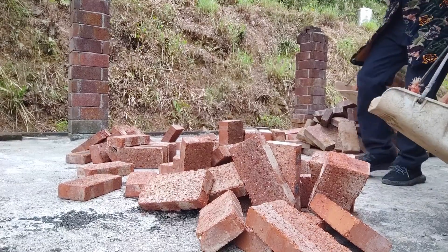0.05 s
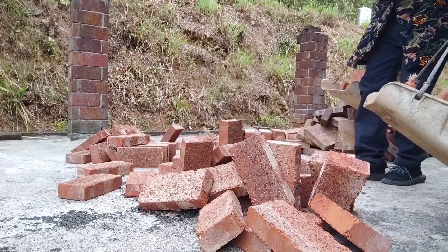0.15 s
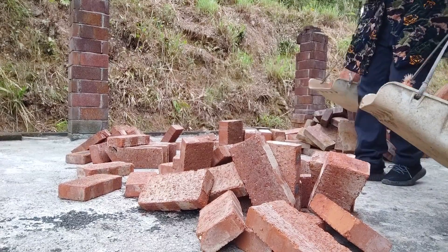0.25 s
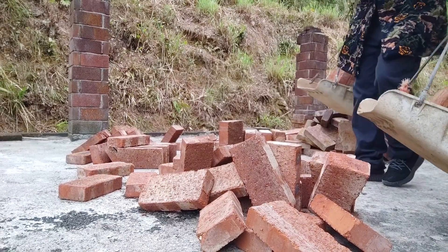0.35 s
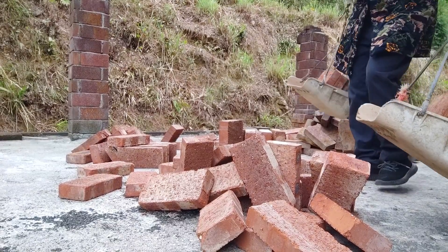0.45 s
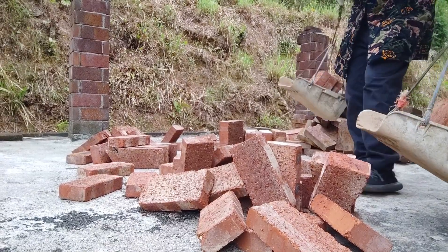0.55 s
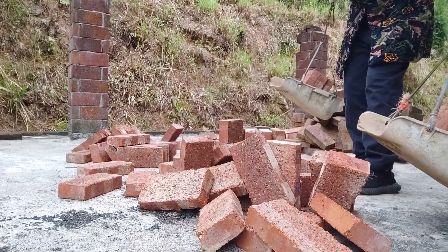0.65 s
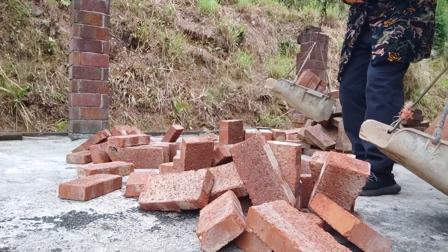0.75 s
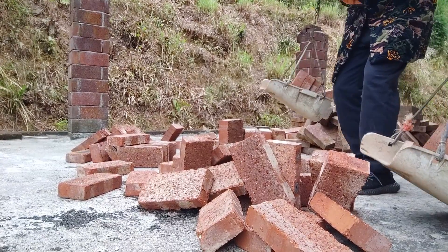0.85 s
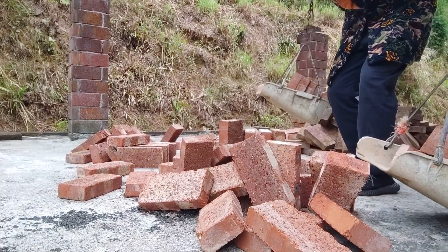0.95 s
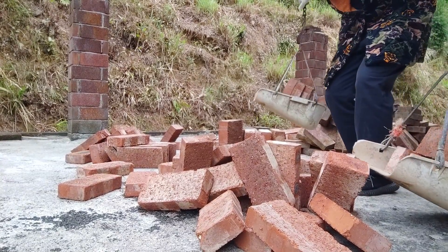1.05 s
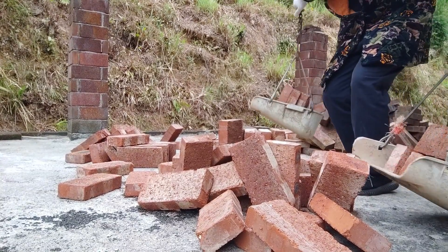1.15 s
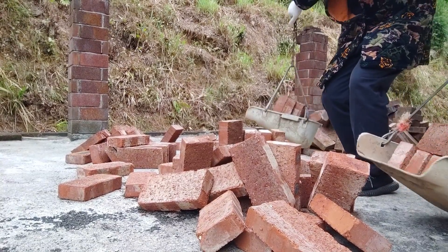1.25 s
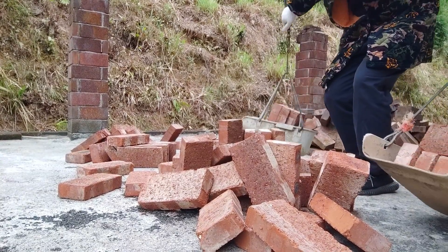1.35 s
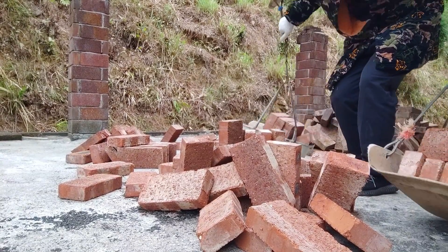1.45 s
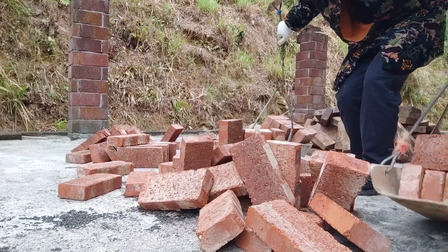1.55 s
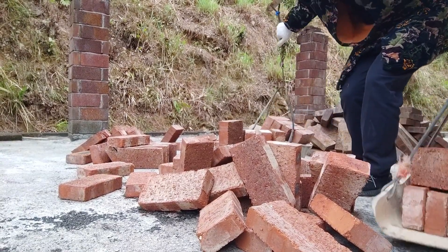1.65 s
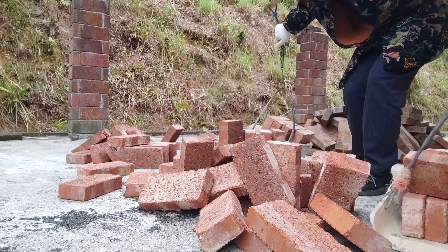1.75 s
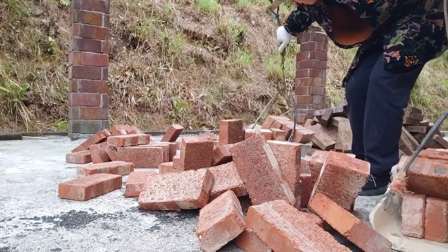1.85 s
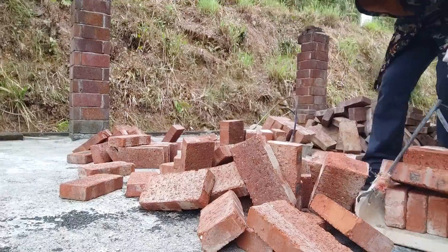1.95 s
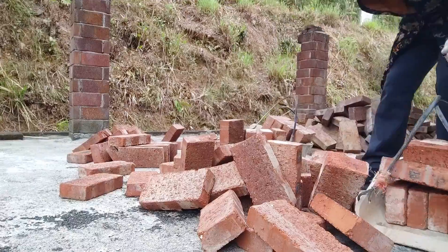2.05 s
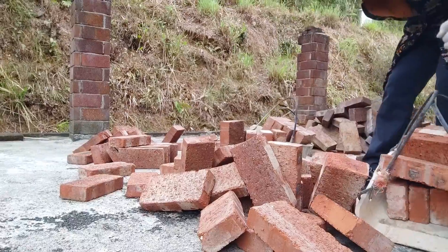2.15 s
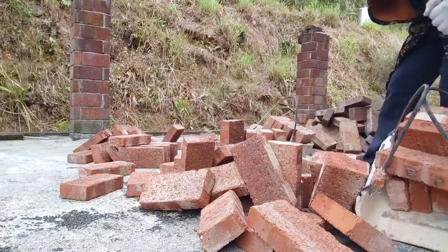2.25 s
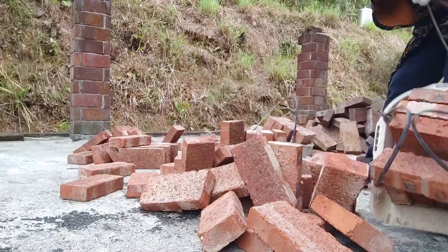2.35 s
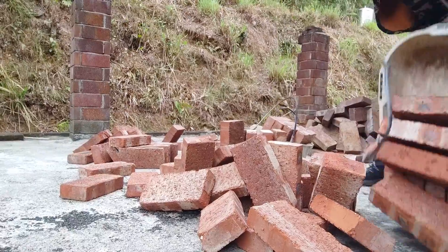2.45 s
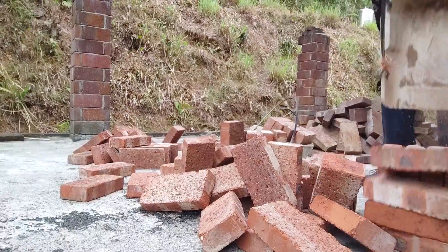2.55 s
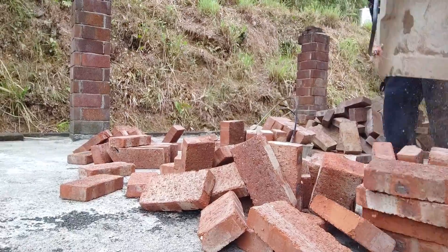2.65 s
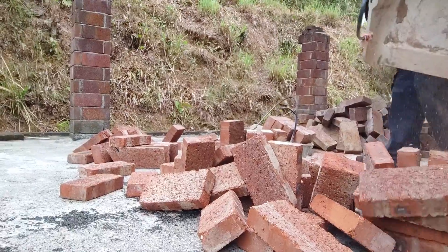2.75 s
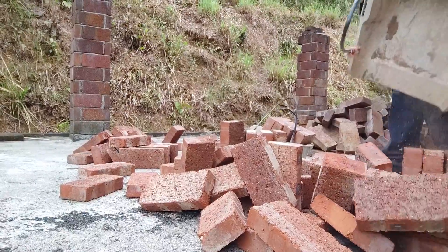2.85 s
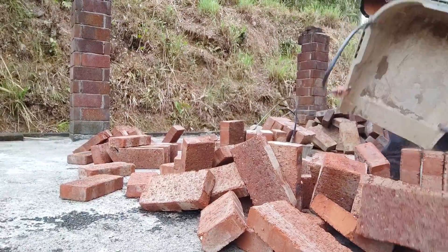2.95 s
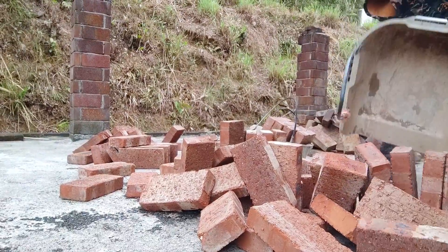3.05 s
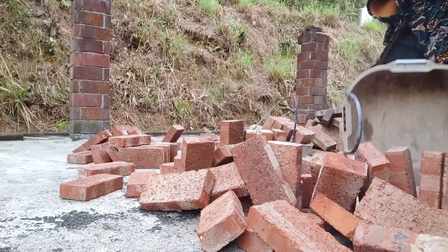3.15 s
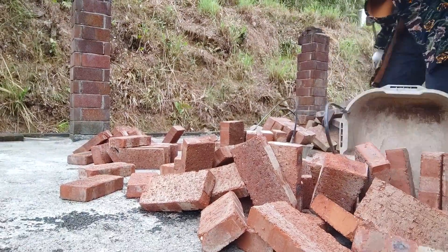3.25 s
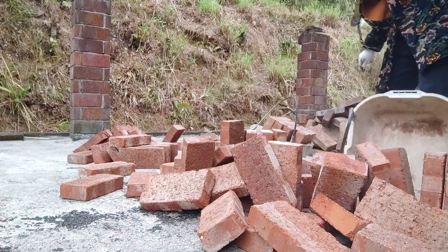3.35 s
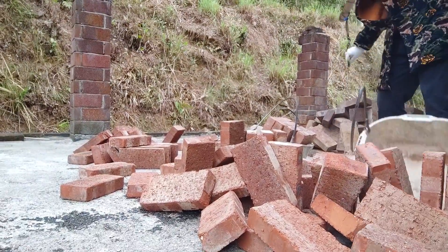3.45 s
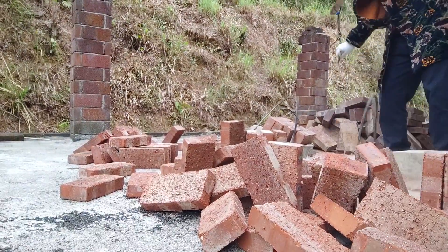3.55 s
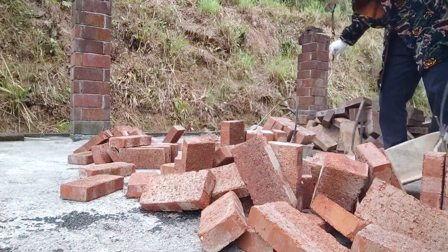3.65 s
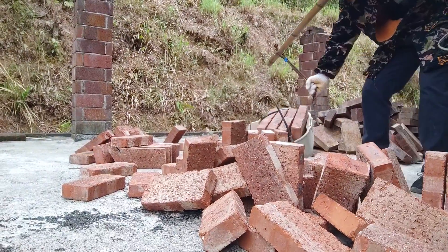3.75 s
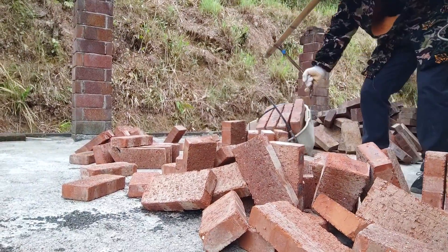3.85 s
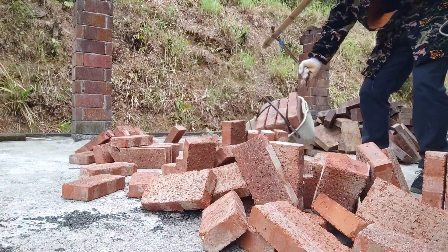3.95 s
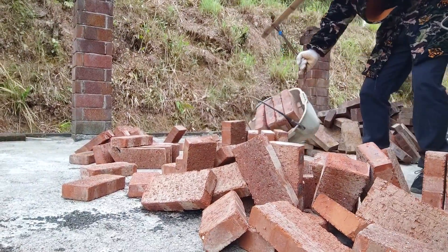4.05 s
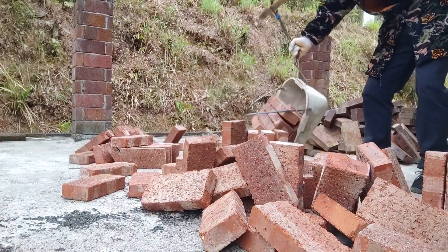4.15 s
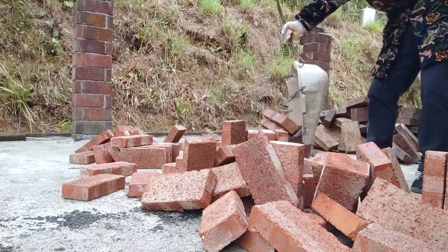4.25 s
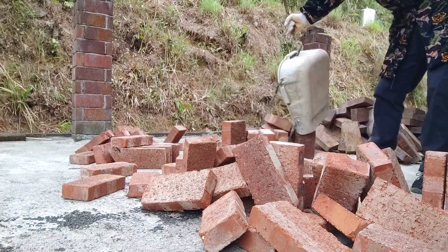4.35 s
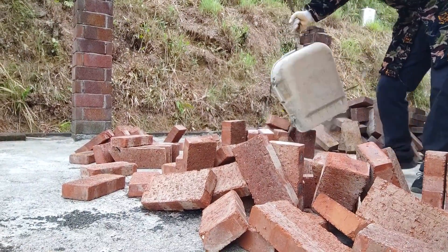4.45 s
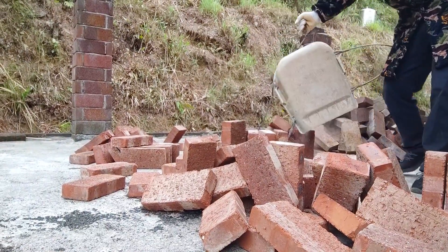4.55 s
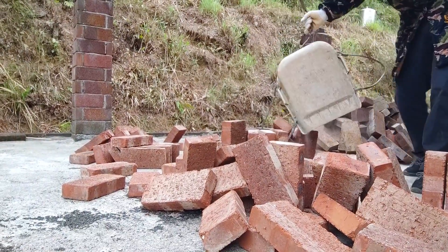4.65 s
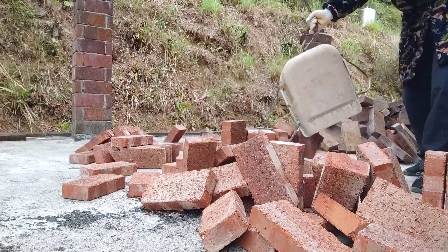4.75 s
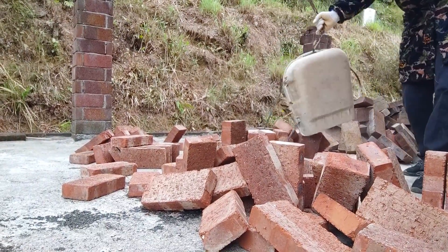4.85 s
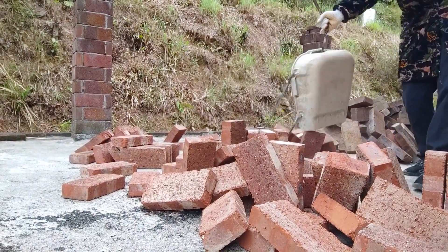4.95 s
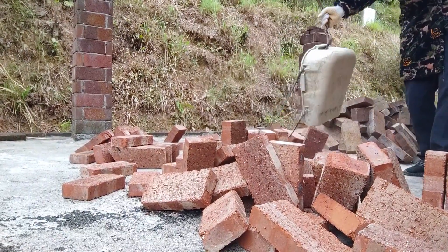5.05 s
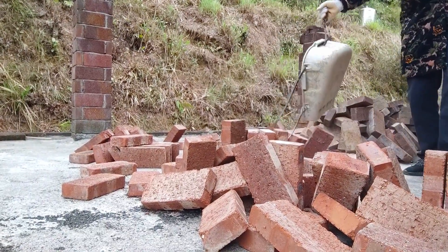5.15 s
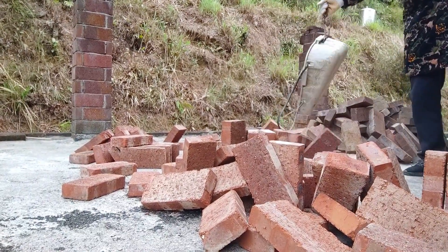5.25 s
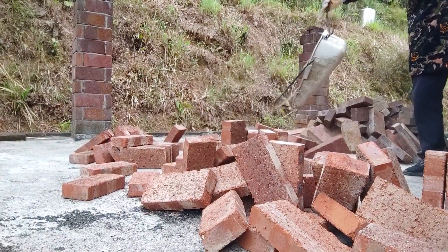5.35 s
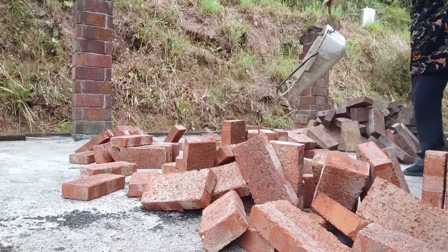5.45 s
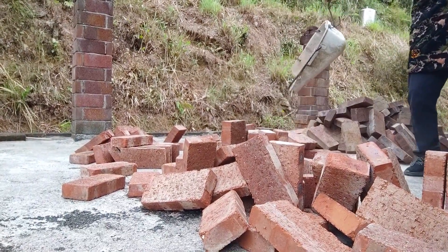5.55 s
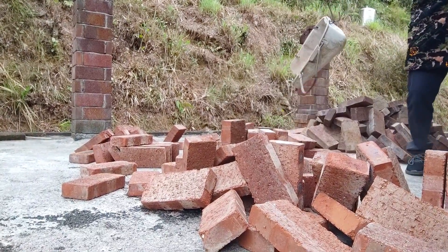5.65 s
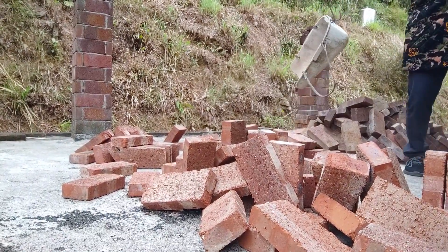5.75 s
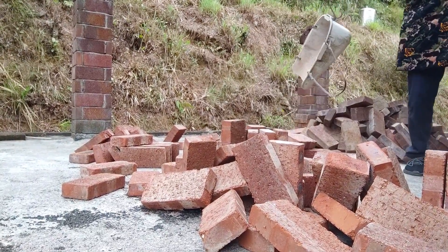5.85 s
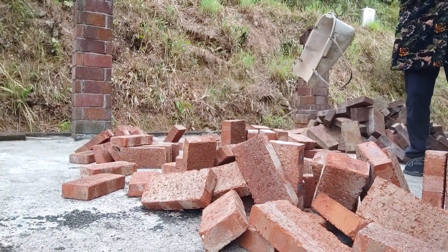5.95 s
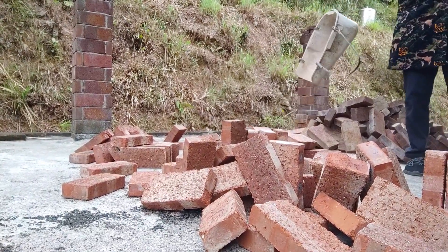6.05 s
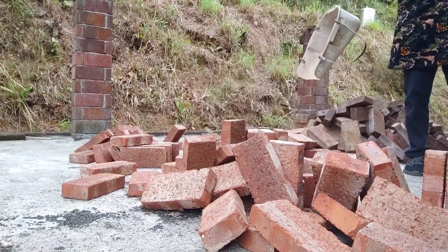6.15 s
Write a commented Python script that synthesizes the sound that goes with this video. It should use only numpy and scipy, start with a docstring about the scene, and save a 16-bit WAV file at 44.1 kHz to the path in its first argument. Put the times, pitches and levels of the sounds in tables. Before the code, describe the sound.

Two baskets of bricks are tipped in a concrete yard: sharp clacks, a gritty rush, then hollow knocks and faint metallic rattles in wind.

```python
"""Clay bricks tipped from plastic baskets

A worker tips two pole-carried baskets of bricks onto a pile in a concrete yard. Bricks clack as damped modes,
tumble as short tones and slide as grainy noise over a drone; the hollow baskets thump, slap and boom.
Steel hangers ring and rattle, a few squeaks glide, and scattered echo trails the work, which lies to the right.
Wind is coloured noise with short puffs at a close microphone, over a faint steady hiss.
"""
import sys
import numpy as np
from scipy import signal
from scipy.fft import rfft, irfft, next_fast_len
from scipy.io import wavfile
from scipy.ndimage import uniform_filter1d

SR = 44100
rng = np.random.default_rng(int(sys.argv[2]) if len(sys.argv) > 2 else 0)


def to_wav(s):
    """Save 16-bit WAV."""
    ch = np.atleast_2d(s).T  # columns
    pcm = np.round(np.clip(ch, -1, 1) * 32767)  # PCM
    wavfile.write(sys.argv[1], SR, pcm.astype(np.int16))


N = 272979
TIME = np.arange(N) / SR
AGE = TIME[:SR // 2]   # time since a blow [s]

# Event levels and mode levels are relative: each layer adds its own gain.
# Wind strength: (time [s], rumble level [dB], buffeting level [dB])
WIND = [(0.0, -29.5, -43.5), (0.86, -23.5, -29.5), (1.17, -30, -37.5), (1.5, -32.5, -39),
        (1.57, -24.5, -36), (2.62, -28.5, -30.5), (2.76, -46, -35), (2.83, -21.5, -30.5),
        (3.24, -33.5, -26.5), (3.55, -24.5, -32.5), (3.71, -45, -47), (3.93, -37, -42), (4.21, -39, -30),
        (4.36, -35, -33), (4.5, -31.5, -30), (5.59, -26.5, -29), (5.9, -31.5, -41.5), (6.19, -30.5, -44)]
# Side the wind comes from, before its wander: (time [s], left minus right [dB])
WIND_SIDE = [(0.0, -7), (2.74, 2), (2.84, -10), (3.19, 6.5), (3.76, -6), (3.79, -11), (3.89, 11),
             (4.26, 1.5), (5.62, -5.0), (6.02, 3.5), (6.16, -3), (6.19, -22)]
WIND_WANDER_DB, WIND_WANDERS_PER_S = -1.5, 5.6
# Strongest puffs of wind: (time [s], level [dB])
PUFFS = [(0.033, -17.5), (0.057, -17), (0.219, -25.5), (0.414, -20.5), (0.541, -20.5), (0.618, -17.5),
         (0.743, -15.5), (0.774, -15), (1.044, -12), (1.886, -13), (1.953, -14.5), (2.396, -10),
         (2.825, -12), (2.86, -10), (5.45, -14), (5.73, -22)]
# Spectra of the wind layers and of the hiss: (frequency [Hz], level [dB])
RUMBLE_COLOUR = [(15, -1), (30, -3.5), (60, -1), (100, -5), (160, -10.5), (300, -49), (600, -90.5)]
BUFFET_COLOUR = [(60, -7.5), (130, 3.5), (220, 1), (350, -7.5), (500, -19), (750, -28.5), (1300, -52.5)]
PUFF_COLOUR = [(80, 4), (200, 8), (380, -1.5), (620, -14), (900, -32), (1600, -56.5)]
HISS_COLOUR = [(200, 10), (600, -2.5), (1200, -2.5), (2200, 1), (4000, -3.5), (7500, -4.5), (9000, -18.5),
               (11000, -10), (15000, -16)]
HISS_DB, HISS_DB_PER_S = -49, -0.87   # level at the start, and its slow fade
# Left-right likeness of wind and hiss, then of the work: (frequency [Hz], correlation [-1 to 1])
WIND_LIKENESS = [(30, 0.029), (70, 0.19), (140, 0.3), (300, 0.58), (1000, 0.016)]
WORK_LIKENESS = [(100, 0.8), (400, 0.55), (1000, 1), (2500, 0.17), (5000, 0.21), (15000, 0.11)]
# Decay of the yard's echo: (frequency [Hz], t60 [s])
YARD_DECAY = [(100, 0.049), (500, 0.4), (2500, 0.25), (8000, 0.27), (16000, 0.085)]
# Direction of the work: (time [s], delay at the left port [ms])
BEARING = [(0, 0.22), (3.7, 0.21), (4.2, 0.07), (6.2, 0.07)]

# Hooks and ropes squeaking under load:
# (start [s], length [s], level [dB], starting pitch [Hz], glide [octaves/s], stick-slip amount [0-1])
SQUEAKS = [(1.827, 0.061, -35.5, 2855, 0.5, 0.1), (1.936, 0.035, -50, 2910, 1.5, 0),
           (3.786, 0.03, -38.5, 2875, -2.5, 0.9), (3.838, 0.023, -46, 2900, 3.5, 0.24),
           (3.978, 0.057, -49, 967, -0.7, 0.2), (5.337, 0.025, -48.5, 2860, 1, 0.43)]
SLIPS_PER_S, SQUEAK_ATTACK_S, SQUEAK_RELEASE_S, SQUEAK_WAVER = 350, 0.022, 0.015, 0.0042
# Loose hangers rattling while a basket is shaken or swung:
# (start [s], length [s], level [dB], pitch that rings most [Hz])
RATTLES = [(2.698, 0.24, -36.5, 2020), (2.97, 0.094, -39.5, 2700), (3.058, 0.11, -34, 2350),
           (3.25, 0.4, -41.5, 2180), (4.401, 0.14, -43.5, 2530), (4.505, 0.15, -45.5, 2470),
           (4.697, 0.11, -41, 2670), (4.853, 0.11, -44, 2680), (5.01, 0.24, -38.5, 2440)]
RATTLE_ATTACK_S, RATTLE_RELEASE_S = 0.026, 0.048
# Jolts of the steel hangers: (time [s], level [dB], pitch that rings most [Hz])
JOLTS = [(2.581, -18, 2330), (2.881, -16.5, 2260), (3.016, -24, 3000), (3.5668, -25.5, 2220),
         (4.4016, -30, 2653), (4.703, -39, 2200), (5.013, -38, 2930), (5.1905, -29.5, 2280),
         (5.236, -23.5, 2200), (5.406, -24.5, 2460), (5.558, -38.5, 2830)]
# Modes of the steel hangers; jolts choke them and rattles only use the first two columns:
# (frequency [Hz], level [dB], t60 [s])
HANGER_MODES = [(1870, 6, 0.3), (1965, 4.5, 0.35), (2130, -0.5, 0.25), (2210, 8, 0.11), (2356, 7, 0.31),
                (2590, 2, 0.18), (2820, 2.5, 0.13), (2844, 2, 0.45), (2994, 10, 0.17), (3330, -13.5, 0.15),
                (4050, -5, 0.15)]

# The second basket, still full, lands on the pile with a short boom that stops abruptly
LANDING_S, BOOM_END_S, BOOM_FLANK_S = 3.6485, 3.702, 0.008
LANDING_DB = -14.5
# Modes of the full basket's floor: (frequency [Hz], level [dB], t60 [s])
FLOOR_MODES = [(332, 1, 0.12), (433.3, 1, 0.18), (721, 8, 0.089), (992, 4, 0.12), (987, -15, 0.073)]
# Blows on the baskets; a loaded wall flexes higher than an empty one:
# (time [s], thump level [dB], slap level [dB], flexing wall pitch [Hz], favoured rim pitch [Hz])
KNOCKS = [(0.715, -11.5, -37.5, 205, 714), (0.986, -9.5, -30.5, 171, 1020), (1.566, -5.5, -19, 173, 690),
          (1.621, -5.5, -39, 174, 600), (1.635, -10.5, -35, 268, 600), (1.786, -8.5, -14.5, 237, 980),
          (2.162, -6.5, -21, 312, 766), (2.25, -14, -28, 325, 750), (2.428, -7.5, -20, 302, 700),
          (2.456, -7.5, -16.5, 400, 696), (2.477, -3.5, -23, 400, 680), (2.522, -9.5, -18.5, 316, 718.6),
          (2.578, -5.5, -17, 310, 955), (2.616, -1.5, -15, 322, 700), (2.645, -0.5, -12.5, 354, 750),
          (2.661, -2, -14, 172, 890), (2.883, -8, -32, 173, 1000), (3.054, -8.5, -28.5, 264, 850),
          (3.077, -11, -29, 372, 700), (3.115, -7, -16.5, 335, 720), (3.151, -5, -14.5, 293, 734),
          (3.303, -1, -25, 240, 810), (3.317, -5.5, -26, 248, 700), (3.361, -3.5, -23.5, 247, 620),
          (3.649, -9, -17, 308, 940), (3.656, -4.5, -25.5, 312, 980), (3.68, -12, -35, 418, 750),
          (4.263, -7.5, -19, 385, 700), (4.289, -6.5, -36, 268, 796), (4.333, -2, -15, 190, 970),
          (4.367, 0.5, -15, 164, 770), (4.382, 1, -20, 204, 680), (4.545, -1, -14, 210, 895),
          (4.966, 0.5, -16, 205, 850), (5.015, -8, -16.5, 200, 930), (5.054, -5.5, -18.5, 186, 810),
          (5.141, -5, -27.5, 174.4, 850), (5.2275, -2.5, -16, 197, 990), (5.406, -24, -24.5, 142, 780),
          (5.557, -1.5, -14, 247, 970)]
# Modes of the basket wall, before each blow detunes them: (frequency [Hz], level [dB], t60 [s])
WALL_MODES = [(156, -16.5, 0.038), (208, -14, 0.098), (275.3, -14.5, 0.1), (319, -11.5, 0.1),
              (413.7, -13, 0.11), (482.7, -21.5, 0.23), (554.2, -25.5, 0.22)]
# Modes of the stiff rim and ribs, before detuning: (frequency [Hz], level [dB], t60 [s])
RIM_MODES = [(597.7, 1, 0.054), (700, 2, 0.06), (862, -1, 0.046), (982, -0.5, 0.044), (1125, -5, 0.036),
             (1363, -2.5, 0.03)]
# A thump that outweighs its slap by more than the usual gap is soft, and its flex lasts longer
USUAL_GAP_DB, SOFTNESS_SHARE = 18, 0.26   # softness gains this share [dB/dB] of the excess

# Bricks sliding, with a few scuffs of feet, rustles and rope:
# (start [s], length [s], drone level [dB], scrape level [dB], grit level [dB], starting drone pitch [Hz])
SLIDES = [(0.223, 0.0099, -50, -50, -52, 300), (0.682, 0.043, -40, -51, -54, 300),
          (0.965, 0.012, -29.5, -28, -39.5, 285), (1.39, 0.053, -53, -49.5, -51, 450),
          (1.51, 0.187, -34, -39.5, -52, 480), (1.579, 0.048, -36, -34, -43, 327),
          (1.742, 0.0088, -35, -29.5, -45, 332.6), (1.821, 0.14, -38.5, -40.5, -53.5, 440),
          (2.04, 0.13, -61, -58, -54.5, 393.2), (2.34, 0.058, -37, -41, -45.5, 350),
          (2.428, 0.033, -16, -24, -31, 474.7), (2.49, 0.035, -17.5, -48, -65, 406.4),
          (2.72, 0.081, -31, -60, -71, 397), (2.862, 0.11, -54, -36.5, -42.5, 329),
          (3.39, 0.2, -39.5, -55, -60.5, 418), (3.93, 0.16, -38, -47.5, -83, 522.4),
          (4.135, 0.045, -24.5, -27.5, -44, 440), (4.212, 0.081, -21, -27.5, -41, 399.7),
          (4.33, 0.047, -23.5, -27, -41, 294), (5.073, 0.04, -45, -44, -46.5, 342),
          (5.355, 0.066, -63, -46.5, -52, 350)]
SLIDE_ATTACK_S, SLIDE_RELEASE_S = 0.032, 0.037   # time for 20 dB
GRIT_DB_PER_S = -16   # the grit wears off on the way
# Bricks jostling as they pour out: (start [s], length [s], level [dB], middle pitch [Hz])
TUMBLES = [(2.42, 0.061, -22, 2330), (2.486, 0.072, -28.5, 1860), (2.643, 0.068, -20, 2320),
           (4.101, 0.09, -35, 1900), (4.204, 0.14, -29.5, 1615)]
# Brick striking brick: (time [s], clack level [dB], crack level [dB], centre of the ring [Hz])
CLACKS = [(1.4224, -37, -36.5, 4000), (1.578, -12, -34, 1800), (1.637, -30.5, -37, 3200),
          (1.747, -19, -44, 2160), (1.789, -11.5, -14.5, 2830), (2.162, -13, -32.5, 1700),
          (2.235, -39, -40, 3000), (2.25, -25, -37.5, 1560), (2.356, -36, -27.5, 2775),
          (2.389, -34, -32, 2830), (2.413, -19, -36, 3040), (2.4214, -9, -20.5, 3840),
          (2.4307, -28, -23, 2500), (2.4387, -15.5, -21, 3100), (2.448, -19, -47, 1900),
          (2.473, -20, -30, 3100), (2.507, -18, -30, 3620), (2.5226, -17.5, -24, 1500),
          (2.58, -13, -30.5, 2230), (2.6196, -17.5, -44, 2900), (2.6386, -4.5, -23, 2230),
          (2.6556, 0.5, -31, 1965), (2.6622, -9, -50, 2300), (2.6745, -3, -26, 1880),
          (2.678, -10.5, -33, 3630), (2.695, -11, -43, 1960), (2.697, -10.5, -57, 2880),
          (2.721, -38, -58, 2300), (2.793, -34, -50, 1950), (2.806, -22, -54, 1980),
          (2.849, -22.5, -58, 2310), (2.885, -30, -29, 2200), (2.948, -30, -48, 1930),
          (2.967, -28, -59, 2750), (3.0548, -7, -33, 1950), (3.1171, -18.5, -35, 3000),
          (3.132, -30, -40, 3000), (3.1539, -18, -31, 1650), (3.21, -32, -68, 1400),
          (3.242, -24, -52, 2110), (3.3027, -17, -47, 1370), (3.318, -23, -35.5, 1483),
          (3.359, -22.5, -47, 1890), (3.411, -30.5, -60, 2200), (3.649, -20, -31.5, 2830),
          (3.659, -19.5, -32, 1840), (3.68, -19, -42.5, 1720), (3.904, -36, -62, 1674),
          (3.936, -36.5, -50, 1966), (4.109, -28.5, -45, 1800), (4.134, -26, -43.5, 3120),
          (4.162, -23, -44.5, 1405), (4.174, -34, -50, 2498), (4.2089, -19.5, -47, 2220),
          (4.227, -18, -36, 1860), (4.261, -28, -40, 1703), (4.274, -18.5, -43, 2280),
          (4.286, -16, -43, 1697), (4.3257, -3.5, -48, 1854), (4.3361, -6.5, -50.5, 2096),
          (4.348, -24, -45, 3050), (4.544, -26, -63, 1480), (5.0982, -21.5, -36, 1230),
          (5.228, -29, -58, 2150), (5.405, -41, -43, 2190), (5.558, -28.5, -53, 2500)]
# Modes of a brick, before each blow detunes them: (frequency [Hz], level [dB], t60 [s])
BRICK_MODES = [(1288, -15, 0.049), (1543, 7.5, 0.014), (1830, -11, 0.035), (1868, 4, 0.018),
               (1966, 3.5, 0.027), (2113, 2.5, 0.024), (2322, -0.5, 0.067), (2504, 5, 0.03),
               (2880, -4, 0.065), (2976, 0.5, 0.039), (3592, -4.5, 0.029), (4110, -12.5, 0.068),
               (5370, -2, 0.067)]
CRUNCH_SHARE = 0.18   # crunch [dB] for each dB of crack over clack
# A struck brick rocks back once, softly, after a pause of uneven length
REBOUND_S, REBOUND_SPREAD, REBOUND_DB = 0.03, 0.39, -17
# Spectra of the basket and brick noises: (frequency [Hz], level [dB])
SLAP_COLOUR = [(250, -38), (450, 1), (720, 5.5), (1050, -7), (1400, -11), (2000, -18.5), (4000, -47.5)]
CRACK_COLOUR = [(1500, 9), (3500, 6), (5000, 10), (7500, 8), (9000, -5), (11000, 3), (15000, -1.5)]
DRONE_COLOUR = [(150, -28), (280, -7), (410, -0.5), (520, -3), (680, -8.5), (850, -25.5), (1200, -41.5),
                (2500, -56)]
SCRAPE_COLOUR = [(450, -1.5), (900, 1.5), (1350, 5.5), (1700, -1), (2300, 2.5), (3200, 0), (4500, -9.5),
                 (7000, -30)]
GRIT_COLOUR = [(2500, 4), (4500, 2.5), (7500, 2), (9000, -12.5), (11000, -5), (15000, -8.5)]
CUTOFF_HZ = 15700


def from_db(db):
    """Decibels to amplitude."""
    return 10 ** (np.asarray(db) / 20)


def rms_one(x):
    """Scale to rms 1."""
    return x / np.sqrt(np.mean(x ** 2) + 1e-20)


def blow_one(x):
    """Scale a blow to rms 1 over its loudest 5 ms."""
    power = np.mean(np.atleast_2d(x) ** 2, axis=0)
    return x / np.sqrt(uniform_filter1d(power, size=220).max() + 1e-20)


def in_time(rows):
    """Draw straight lines between timed rows, one curve per column."""
    s, *columns = np.transpose(rows)
    return [np.interp(TIME, s, c) for c in columns]


def at_hz(points, hz):
    """Read a frequency table along a logarithmic axis."""
    f, value = np.transpose(points)
    return np.interp(np.log(hz + 1), np.log(f), value)


def dying(t60):
    """Exponential decay that falls 60 dB in t60 seconds, 2 ms at least."""
    return from_db(-60 * AGE / max(t60, .002))


def mode(hz, t60, phase=0):
    """One damped resonance: a sine that dies exponentially."""
    return np.sin(2 * np.pi * hz * AGE + phase) * dying(t60)


def stroke(start, length, attack_s, release_s):
    """Swell, hold and die away; each flank takes its time for 20 dB."""
    early = np.maximum(start - TIME, 0)
    late = np.maximum(TIME - start - length, 0)
    return from_db(-20 * np.minimum(early / attack_s + late / release_s, 10))


def add(out, s, sound):
    """Mix a sound in at a given time."""
    start = max(round(s * SR), 0)
    out[..., start:start + sound.shape[-1]] += sound[..., :N - start]


def colour(x, spectrum):
    """Causal (minimum-phase) filter with the given spectrum, built by folding its cepstrum."""
    size = 2 * next_fast_len(x.shape[-1] // 2 + 2048)
    hz = np.arange(size // 2 + 1) * SR / size
    cepstrum = irfft(np.log(from_db(at_hz(spectrum, hz))))
    cepstrum[1:size // 2] *= 2
    cepstrum[size // 2 + 1:] = 0
    return irfft(rfft(x, size) * np.exp(rfft(cepstrum)))[..., :x.shape[-1]]


def stereo(pair, likeness):
    """Two unrelated signals become left and right, alike in the given measure."""
    size = 2 * next_fast_len(pair.shape[-1] // 2 + 1)
    hz = np.arange(size // 2 + 1) * SR / size
    alike = np.clip(at_hz(likeness, hz), -.99, .99)
    mid, side = irfft(rfft(pair, size) * np.sqrt([1 + alike, 1 - alike]))[:, :pair.shape[-1]]
    return np.array([mid + side, mid - side])


def drift(rate):
    """Random wander of rms 1, with rate knots a second and no wild extremes."""
    knots = np.tanh(rng.standard_normal(4000) / 1.6)
    return rms_one(np.interp(TIME * rate, np.arange(len(knots)), knots))


def tremble(rate):
    """Random wander of spread about 1 over the length of one ring."""
    return np.interp(AGE * rate, np.arange(400), rng.standard_normal(400))


def noise(spectrum, likeness, flutter_db, flutter_rate):
    """Coloured stereo noise of uneven strength; rms 1."""
    white = rng.standard_normal((2, N)) * from_db(flutter_db * drift(flutter_rate))
    return rms_one(colour(stereo(white, likeness), spectrum))


def burst(spectrum, t60, tail_db, tail_t60):
    """Countless damped modes heard as one noise burst, with a fainter tail behind."""
    envelope = dying(t60) + from_db(tail_db) * dying(tail_t60)
    white = rng.standard_normal((2, len(AGE)))
    return blow_one(colour(stereo(white * envelope, WORK_LIKENESS), spectrum))


def grains(spectrum, per_s, size_db, bed_db):
    """Sand grains catch and snap at random, over a bed of finer rubbing; rms 1."""
    sizes = from_db(size_db * np.minimum(rng.exponential(1, N), 2))
    snaps = (rng.random(N) < per_s / SR) * sizes
    strength = rms_one(snaps) + from_db(bed_db)
    white = np.tanh(rng.standard_normal((2, N)))
    return rms_one(colour(stereo(white * strength, WORK_LIKENESS), spectrum))


def struck(modes, hz, width_octaves, spread):
    """Modes ring with strengths that fall away from the pitch that the contact favours."""
    ring = 0
    for f, db, t60 in modes:
        strength = from_db(db) / (1 + (np.log2(f / hz) / width_octaves) ** 2)
        phase = rng.uniform(0, 2 * np.pi) + rng.normal(0, 0.76, (2, 1))
        ring = ring + strength * mode(f * rng.normal(1, spread), t60, phase)
    return blow_one(ring * (1 - np.exp(-AGE / 0.0022)))   # softened onset


def hiss():
    """Faint broadband noise that fades steadily."""
    fading = from_db(HISS_DB + HISS_DB_PER_S * TIME)
    return fading * noise(HISS_COLOUR, WIND_LIKENESS, flutter_db=1.5, flutter_rate=64)


def wind(rumble_db, buffet_db, puff_db):
    """A deep rumble at the microphone ports with quicker lumps above it, and now and then a short puff."""
    deep_db, lumps_db = in_time(WIND)
    side_db = in_time(WIND_SIDE)[0] + WIND_WANDER_DB * drift(WIND_WANDERS_PER_S)
    rumble = noise(RUMBLE_COLOUR, WIND_LIKENESS, flutter_db=-2.0, flutter_rate=38)
    buffeting = noise(BUFFET_COLOUR, WIND_LIKENESS, flutter_db=4.5, flutter_rate=70)
    out = from_db(deep_db + rumble_db) * rumble + from_db(lumps_db + buffet_db) * buffeting
    for s, level_db in PUFFS:
        puff = burst(PUFF_COLOUR, t60=0.044, tail_db=-24, tail_t60=0.12)
        add(out, s, from_db(level_db + puff_db) * puff)
    return out * from_db(side_db * np.array([[.5], [-.5]]))


def yard(x):
    """Scatter from slab, pillars and bank: noise bands that each die at their own pace."""
    edges = np.geomspace(80, 16000, 8)
    tail = 0
    for low, high in zip(edges, edges[1:]):
        band_pass = signal.butter(2, [low, high], "band", fs=SR, output="sos")
        band = signal.sosfilt(band_pass, rng.standard_normal((2, len(AGE))))
        tail = tail + band * dying(at_hz(YARD_DECAY, np.sqrt(low * high)))
    tail = tail * (1 - np.exp(-AGE / 0.00064))
    return signal.fftconvolve(x, tail / np.sqrt(np.sum(tail ** 2) / 2), axes=1)[:, :N]


def from_the_right(x, left_db):
    """The sound reaches the left port later and a little weaker."""
    delay_ms, = in_time(BEARING)
    late = np.round(delay_ms * SR / 1000).astype(int)
    left = x[0, np.clip(np.arange(N) - late, 0, N - 1)]
    return np.array([from_db(left_db) * left, x[1]])


def squeaks(squeak_db):
    """A thin wavering tone, chopped by stick and slip when the grip is coarse."""
    out, waver = 0, 1 + SQUEAK_WAVER * drift(150)
    for start, length, db, hz, glide, depth in SQUEAKS:
        bend = 2 ** (glide * np.clip(TIME - start, 0, length))
        warped_s = np.cumsum(waver * bend) / SR   # time stretched by waver and glide
        chopping = 1 + 2 * depth * np.cos(2 * np.pi * SLIPS_PER_S * warped_s)
        tone = rms_one(np.sin(2 * np.pi * hz * warped_s) * chopping)
        out = out + from_db(db + squeak_db) * tone * stroke(start, length, SQUEAK_ATTACK_S, SQUEAK_RELEASE_S)
    return out * from_db(2.5 * drift(120))


def rattle(rattle_db, per_s, rub_db, focus_octaves):
    """The hooks chatter and rub in their holes: many small taps, whose colour shifts with the way the hook sits."""
    bouts = [from_db(db) * stroke(start, length, RATTLE_ATTACK_S, RATTLE_RELEASE_S)
             for start, length, db, _ in RATTLES]
    gain = sum(bouts)
    favoured = sum(bout * np.log2(row[-1]) for bout, row in zip(bouts, RATTLES)) / gain   # octaves
    taps = (rng.random(N) < per_s / SR) * from_db(5 * np.tanh(rng.standard_normal(N)))
    ring = power = 0
    for f, db, _ in HANGER_MODES:
        r, w = from_db(-60 / (.06 * SR)), 2 * np.pi * f / SR   # resonator with a t60 of 0.06 s
        seating = from_db(2.8 * drift(28))
        strength = seating * (rng.standard_normal(N) + .5 * rng.standard_normal((2, N)))
        share = from_db(db) / (1 + ((np.log2(f) - favoured) / focus_octaves) ** 2)
        resonance = signal.lfilter([1, -1], [1, -2 * r * np.cos(w), r * r], taps * strength + 1e-18)
        ring = ring + share * resonance
        power = power + share ** 2
    rubbing = from_db(rub_db) * grains(SCRAPE_COLOUR, per_s=590, size_db=0.0, bed_db=5.0)
    return from_db(rattle_db) * gain * (rms_one(ring / np.sqrt(power)) + rubbing)


def hangers(ring_db, focus_hz, rest_db):
    """Bent steel rods ring until the load chokes them; they chatter and their pitch wavers."""
    out = np.zeros((2, N))
    choke = np.exp(-(AGE / .12) ** 2) * (1 - np.exp(-AGE / .001))
    for s, level_db, hz in JOLTS:
        ring, load = 0, tremble(rate=5.5)
        for f, db, t60 in HANGER_MODES:
            focus = from_db(rest_db) + np.exp(-((f - hz) / focus_hz) ** 2)
            strength = from_db(db + rng.normal(0, 1.5, (2, 1))) * focus
            bend = .003 * load + .009 * tremble(rate=300)   # share of the pitch
            phase = rng.uniform(0, 2 * np.pi) + rng.normal(0, 1.0, (2, 1))
            phase = phase + 2 * np.pi * f * np.cumsum(bend) / SR
            ring = ring + strength * mode(f, t60, phase)
        chatter = from_db(3 * tremble(rate=140))
        add(out, s, from_db(level_db + ring_db) * blow_one(ring * chatter * choke))
    return out


def landing():
    """The floor modes of the full basket give a short boom that stops abruptly."""
    out = np.zeros((2, N))
    boom = sum(from_db(db) * mode(f, t60) for f, db, t60 in FLOOR_MODES)
    add(out, LANDING_S, from_db(LANDING_DB) * blow_one(boom))
    return out * stroke(LANDING_S, BOOM_END_S - LANDING_S, BOOM_FLANK_S, BOOM_FLANK_S)


def baskets(thump_db, slap_db, flex_t60, give_s, wall_db, rim_db):
    """The plastic wall flexes briefly, the rim slaps and low modes ring on, less so after a sharp blow."""
    out = np.zeros((2, N))
    for s, low_db, mid_db, flex_hz, rim_hz in KNOCKS:
        excess_db = np.clip(low_db - mid_db - USUAL_GAP_DB, -8, 8)
        softness = from_db(SOFTNESS_SHARE * excess_db)
        flex = -mode(flex_hz, flex_t60 * softness) * (1 - np.exp(-AGE / give_s))
        wall = 0
        for f, db, t60 in WALL_MODES:
            ring = mode(f * rng.uniform(0.92, 1.04), t60, rng.normal(0, 0.17, (2, 1)))
            wall = wall + from_db(db + wall_db) * ring * rng.choice([-1, 1])
        thump = flex + softness * wall * (1 - np.exp(-AGE / 0.0032))
        add(out, s, from_db(low_db + thump_db) * blow_one(thump))
        slap = burst(SLAP_COLOUR, t60=0.0082, tail_db=-4.0, tail_t60=0.1)
        rim = struck(RIM_MODES, rim_hz, width_octaves=0.6, spread=0.03)
        add(out, s, from_db(mid_db + slap_db) * blow_one(slap + from_db(rim_db) * rim))
    return out


def rubbed(rubbing, wander_db, wanders_per_s):
    """Rubbing sets the bricks ringing; as the contact shifts, now one mode stands out and now another."""
    out = 0
    for k, (f, db, t60) in enumerate(BRICK_MODES):
        r, w = from_db(-60 / (t60 * SR)), 2 * np.pi * f / SR   # resonator radius and angle
        contact = from_db(db + wander_db * drift(wanders_per_s)) * (-1) ** k
        out = out + signal.lfilter([0, np.sin(w)], [1, -2 * r * np.cos(w), r * r], rubbing * contact)
    return rms_one(out)


def sliding(drone_db, scrape_db, grit_db, boom_db, sag_octaves_per_s, boom_width_hz):
    """Sliding and scuffing as stick and slip: grains crackle over a drone that sags as a basket's load runs out."""
    drone_gain = scrape_gain = grit_gain = 0
    boom_hz = np.full(N, SLIDES[0][-1], float)
    for start, length, low_db, mid_db, top_db, hz in SLIDES:
        moving = stroke(start, length, SLIDE_ATTACK_S, SLIDE_RELEASE_S)
        slid_s = np.clip(TIME - start, 0, length)
        drone_gain = drone_gain + moving * from_db(low_db)
        scrape_gain = scrape_gain + moving * from_db(mid_db)
        grit_gain = grit_gain + moving * from_db(top_db + GRIT_DB_PER_S * slid_s)
        sagging_hz = hz * 2 ** (-sag_octaves_per_s * slid_s)
        boom_hz = np.where(TIME > start - SLIDE_ATTACK_S / 2, sagging_hz, boom_hz)
    slips = rms_one(from_db(2.6 * drift(90)))
    boom_phase = 2 * np.pi * np.cumsum(boom_hz + boom_width_hz * drift(200)) / SR
    boom = rms_one(np.sin(boom_phase) * from_db(2.5 * drift(110)))
    hum = noise(DRONE_COLOUR, WORK_LIKENESS, flutter_db=1.0, flutter_rate=130)
    drone = from_db(drone_db) * rms_one(hum + from_db(boom_db) * boom)
    rubbing = grains(SCRAPE_COLOUR, per_s=800, size_db=3, bed_db=-13)
    ringing = rubbed(rubbing, wander_db=3.5, wanders_per_s=80)
    scrape = from_db(scrape_db) * rms_one(rubbing + from_db(-3.0) * ringing)
    grit = from_db(grit_db) * grains(GRIT_COLOUR, per_s=1500, size_db=1, bed_db=-3)
    return slips * (drone_gain * drone + scrape_gain * scrape + grit_gain * grit)


def tumbling(tumble_db, spread_octaves, cycles, count):
    """Corners and edges knock in quick disorder; each touch rings briefly at a pitch of its own."""
    out = np.zeros((2, N))
    for start, length, db, middle_hz in TUMBLES:
        clatter = np.zeros((2, N))
        for k in range(count):
            hz = min(middle_hz * 2 ** (spread_octaves * rng.standard_normal()), SR / 4)
            ring = mode(hz, cycles / hz, rng.normal(0, .6, (2, 1)))
            touch = ring * from_db(rng.normal(0, 4.5)) * rng.choice([-1, 1])
            add(clatter, start + length * (k + rng.random()) / count, touch)
        # the level refers to the tumble's own length
        out += from_db(db + tumble_db) * rms_one(clatter) * np.sqrt(length * SR / N)
    return out


def bricks(clack_db, crack_db, crunch_db):
    """No two bricks ring quite alike; the gritty contact adds a crunch and a crack, and each rebounds once."""
    out = np.zeros((2, N))
    for s, ring_db, top_db, hz in CLACKS:
        pause = REBOUND_S * np.exp(REBOUND_SPREAD * rng.standard_normal())
        for when, force_db in [(s, 0), (s + pause, REBOUND_DB)]:
            ring = struck(BRICK_MODES, hz, width_octaves=0.21, spread=0.0253)
            crunch = burst(SCRAPE_COLOUR, t60=.025, tail_db=-17, tail_t60=.09)
            crunch_gain = from_db(crunch_db + CRUNCH_SHARE * (top_db - ring_db))
            clack = blow_one(ring + crunch_gain * crunch)
            add(out, when, from_db(force_db + ring_db + clack_db) * clack)
            crack = burst(CRACK_COLOUR, t60=.02, tail_db=-21, tail_t60=.09)
            add(out, when, from_db(force_db + top_db + crack_db) * crack)
    return out


def scene():
    """The work at the pile, its echo, wind and hiss."""
    background = hiss() + wind(rumble_db=3.5, buffet_db=3.5, puff_db=-2.0)
    work = squeaks(squeak_db=3.5) + landing()
    work += rattle(rattle_db=1, per_s=380, rub_db=-6.5, focus_octaves=0.42)
    work += hangers(ring_db=-3.5, focus_hz=110, rest_db=-16)
    work += baskets(thump_db=-5.0, slap_db=-0.5, flex_t60=0.031, give_s=0.00098, wall_db=-4.0, rim_db=-3.5)
    work += sliding(drone_db=0.0, scrape_db=-0.5, grit_db=5.0, boom_db=-2.0,
                    sag_octaves_per_s=3.5, boom_width_hz=36.1)
    work += tumbling(tumble_db=-1.5, spread_octaves=0.504, cycles=40, count=28)
    work += bricks(clack_db=-3.5, crack_db=2.5, crunch_db=1.5)
    work = from_the_right(work, left_db=-1.0)
    return work + from_db(-13.5) * yard(work) + background


def record(dry):
    """The loudest peaks are rounded and the top is cut."""
    rounded = dry / (1 + np.abs(dry) ** 6) ** (1 / 6)
    low_pass = signal.ellip(10, .2, 80, CUTOFF_HZ, fs=SR, output="sos")
    return signal.sosfilt(low_pass, rounded)


dry = scene()
out = record(dry)
to_wav(out)
```